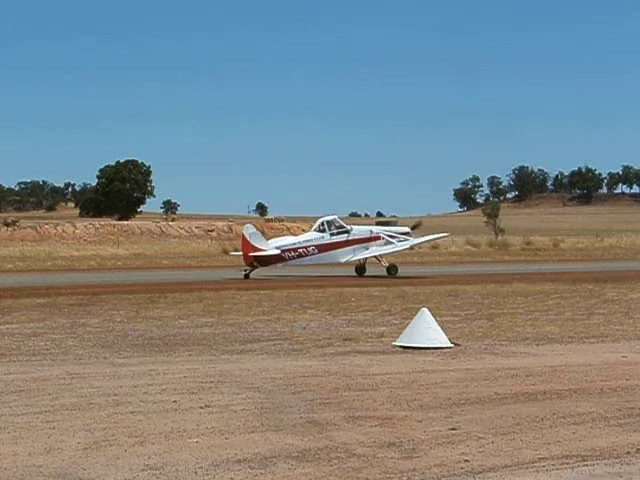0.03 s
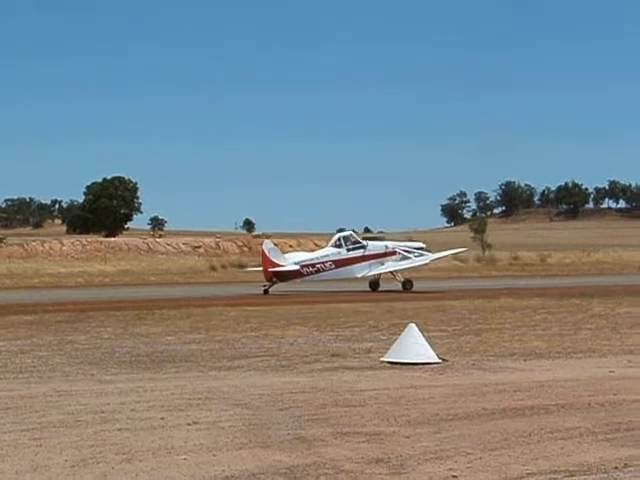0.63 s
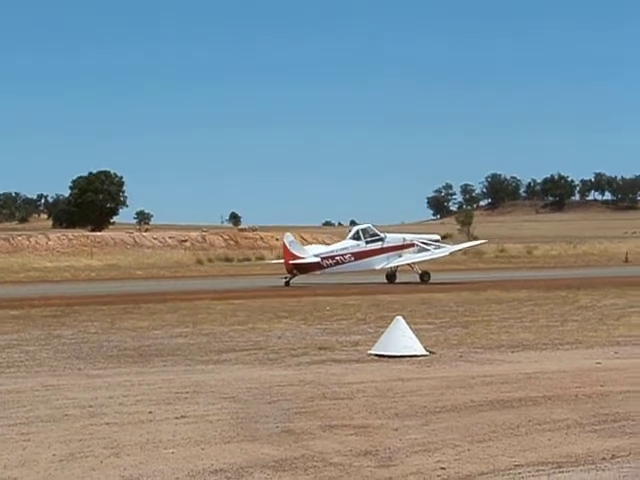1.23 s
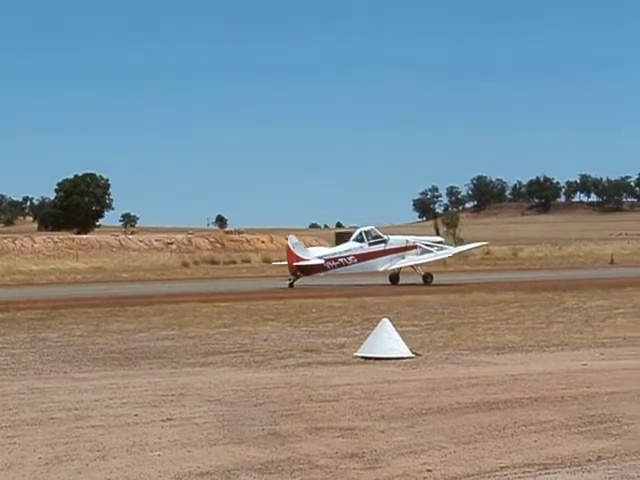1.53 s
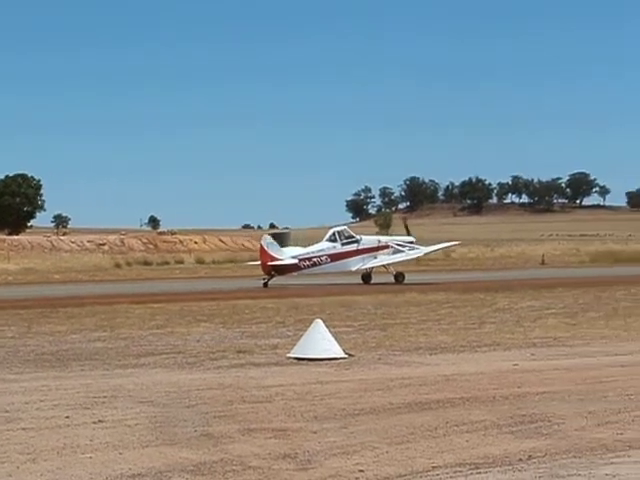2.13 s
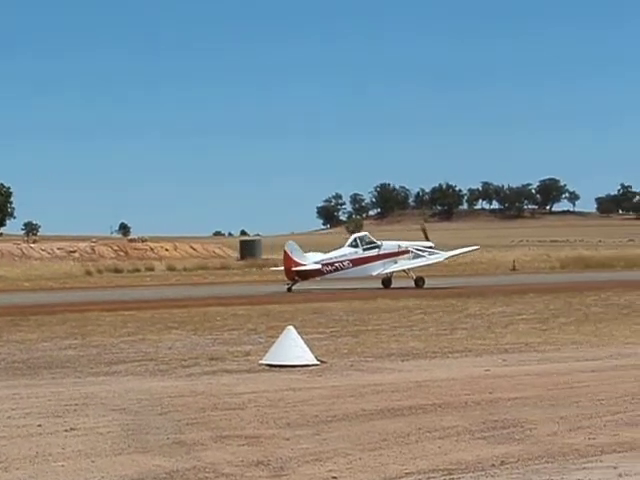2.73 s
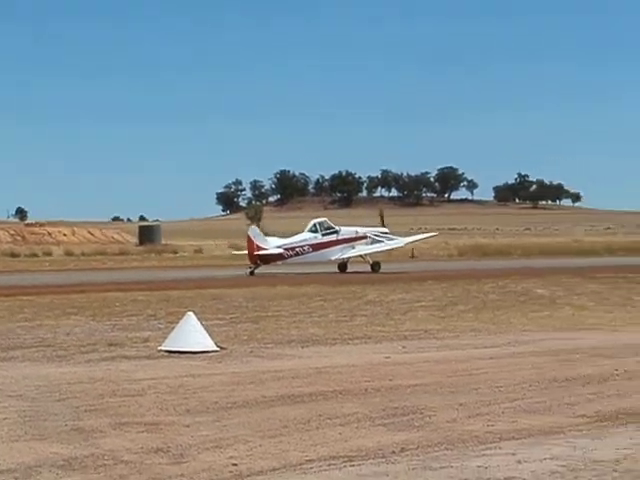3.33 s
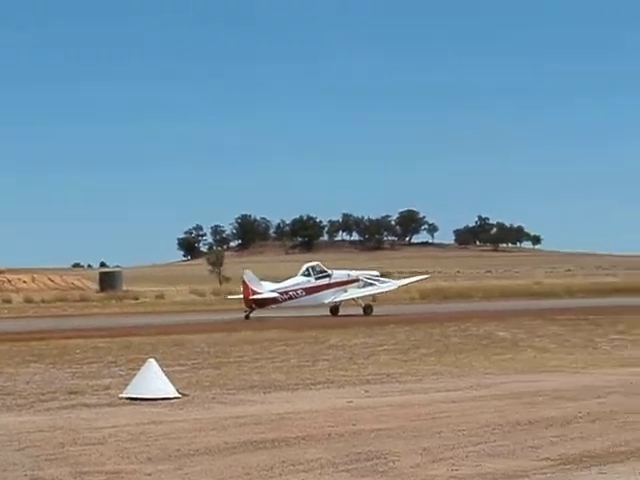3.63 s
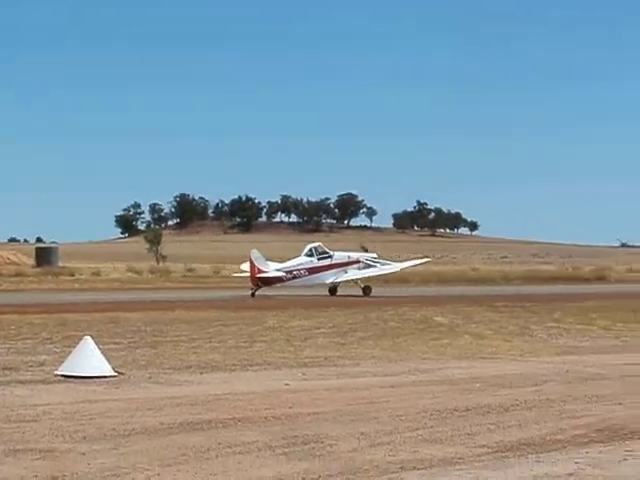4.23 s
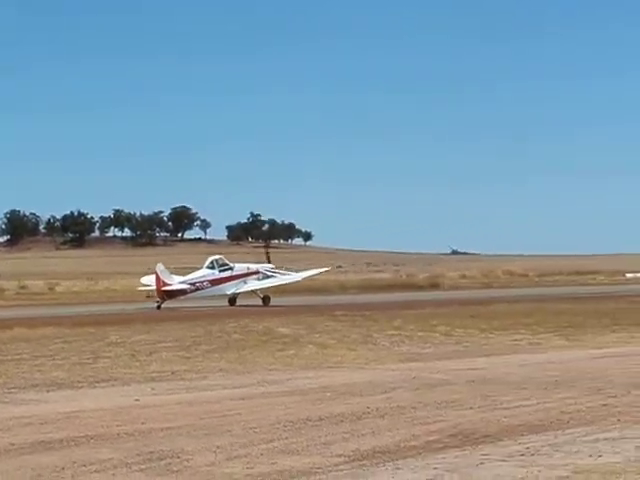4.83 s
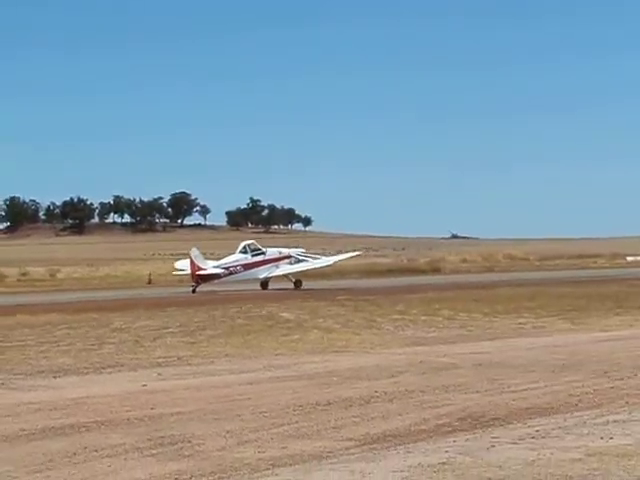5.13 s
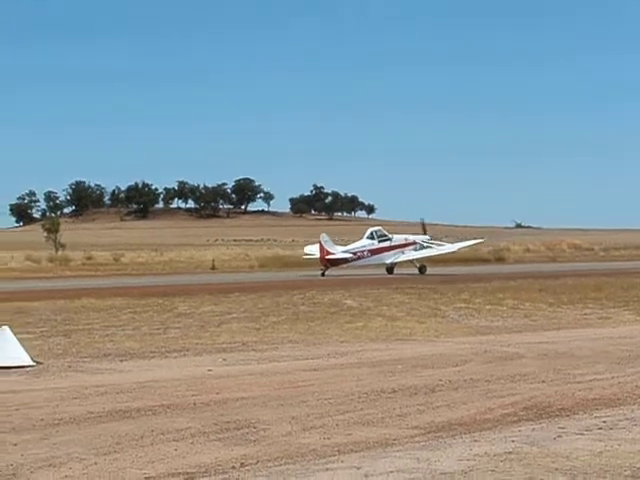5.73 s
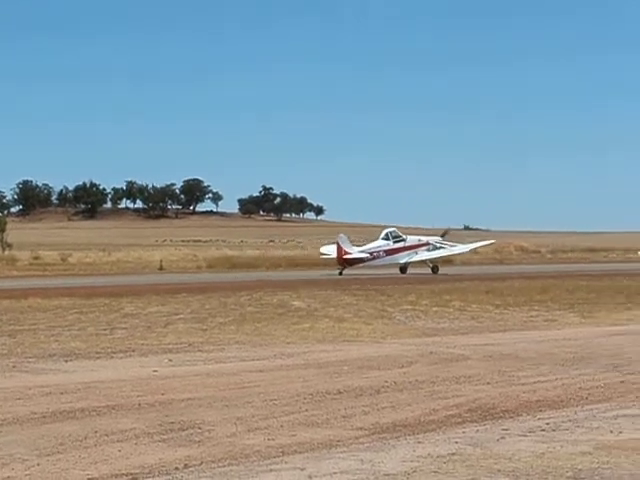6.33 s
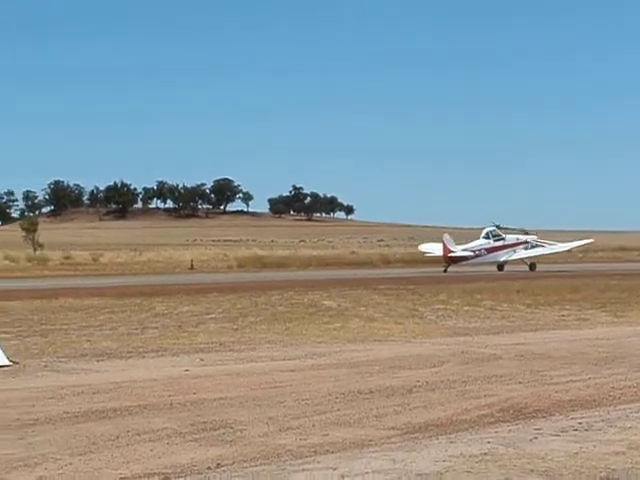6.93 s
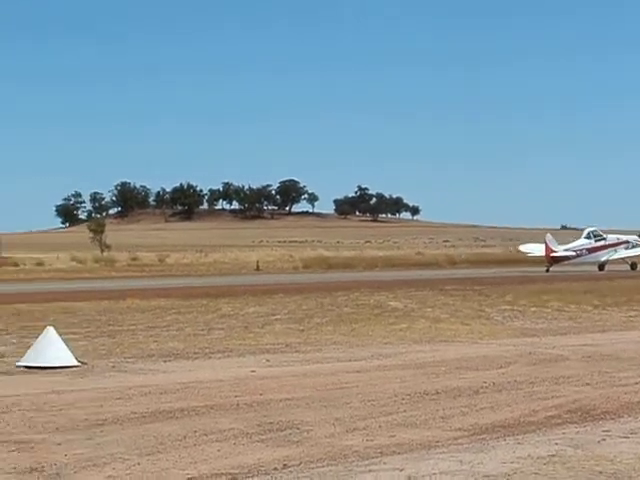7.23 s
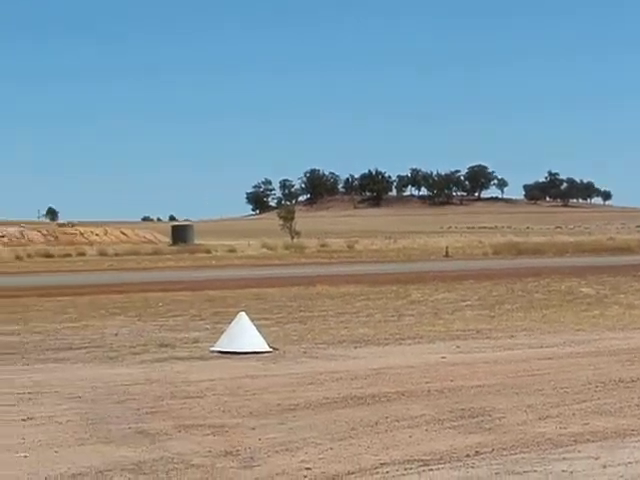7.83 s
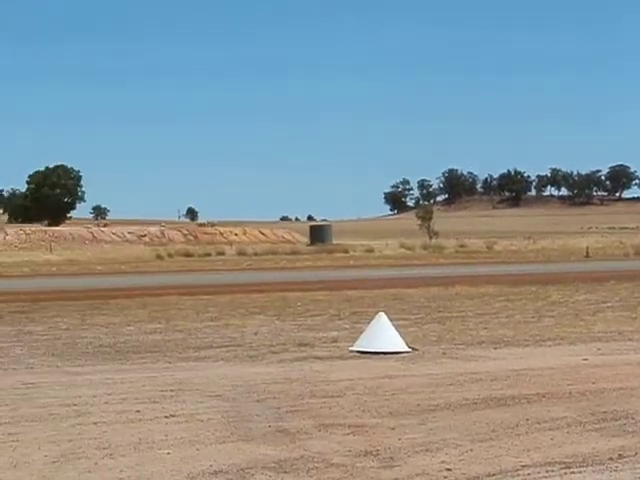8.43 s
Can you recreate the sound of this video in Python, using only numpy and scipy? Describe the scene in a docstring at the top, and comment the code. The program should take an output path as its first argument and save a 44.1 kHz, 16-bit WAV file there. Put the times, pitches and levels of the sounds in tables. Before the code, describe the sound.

Outdoors, a short way from a runway, a light plane's piston engine runs at an even speed, mixing a humming drone and fast exhaust bark with the buzzing rasp of its propeller. It is fullest while passing side-on, then grows thinner, choppier and somewhat quieter from behind. The level drops suddenly and recovers a few times, most clearly early on and near the end. Faint wind rumbles below.

```python
"""The drone and rasp of a single-engined tow plane taxiing past on a dry airfield, near 2100 rpm.
Its six cylinders fire through short exhaust stacks; the two-bladed propeller hums and
rasps once for every blade. Heard from behind, the hum thins out and the rasp turns choppy.
A light breeze rumbles underneath. A few times the whole sound dips abruptly and creeps back,
and once the beat skips with a faint tick."""
import sys
import numpy as np
from scipy import signal
from scipy.fft import rfft, irfft, next_fast_len
from scipy.io import wavfile
from scipy.ndimage import map_coordinates

SR = 44100
rng = np.random.default_rng(int(sys.argv[2]) if len(sys.argv) > 2 else 0)


def inscribe(sig):
    """Save sig as 16-bit PCM at rate SR to the path in sys.argv[1].

    A 1-D sig is mono; a 2-D sig holds one channel per row.
    Samples are clipped to [-1, 1] before scaling.
    """
    pcm = np.round(np.clip(np.atleast_2d(sig).T, -1, 1) * 32767)
    wavfile.write(sys.argv[1], SR, pcm.astype(np.int16))


N = 383229
SKIP_S = 5.42  # the beat skips here

# propeller speed: (time [s], blade passages [Hz])
BLADE_RATE = [(0.08, 67.63), (0.35, 69.4), (0.6, 70.32), (0.9, 70.84), (1.3, 71.3), (2.5, 71.14),
              (4.0, 71.2), (5.4, 71.18), (6.0, 71.25), (6.6, 71.05), (7.3, 70.74), (8.0, 70.84),
              (8.69, 70.8)]
# our angle on the plane: (time [s], view [0 abeam, 1 just past, 2 behind, 3 tail on])
VIEW = [(0.5, 0), (2.4, 0.24), (4.6, 0.2), (5.8, 1.14), (7.3, 2), (7.7, 2.5), (8.7, 2.8)]
# exhaust pulses as they arrive: (position [share of the four-stroke cycle], size [gain])
CYLINDERS = [(0.056, 0.69), (0.229, 0.354), (0.401, 0.625), (0.557, 0.536), (0.732, 0.33), (.9, 0.914)]
# how low thrum, drone and exhaust bark radiate towards us: (view [0-3], level [dB])
THRUM_BEAM = [(0, -32), (1, -30), (2, -35), (2.5, -41)]
DRONE_BEAM = [(0, -24), (1, -26), (2, -25), (2.5, -28), (3, -28.5)]
BARK_BEAM = [(0, -29.5), (0.25, -33.5), (0.5, -31.5), (1, -32.5), (2, -37.5), (3, -36.5)]


def drone(cycle, blade_at, blade_size, waver_db, flutter_db):
    """The engine's pitched body: harmonics phased by one push per cylinder and blade."""
    # thrum at the blade and firing rates: (order [per cycle], level [dB])
    thrum_lines = [(4, -5.5), (6, -1.5)]
    # drone harmonics: (order [per cycle], level abeam [dB], just past [dB], behind [dB])
    drone_lines = [(9, -13.5, -13.5, -11.5), (10, -13.5, -8, -12), (13, -38, -18.5, -19),
                   (14, -25.5, -16.5, -23), (15, -18, -15.5, -12), (16, -6, -5, -11),
                   (17, -25.5, -34.5, -25), (18, -18.5, -9, -13.5), (19, -10.5, -9.5, -15.5),
                   (20, -10.5, -5.5, -6.5), (21, -11.5, -9, -12.5), (22, -7.5, -5, -9.5),
                   (23, -14, -31, -14.5), (24, -13, -16, -23), (25, -24, -17.5, -15.5),
                   (26, -19.5, -24, -26), (27, -12.5, -20, -28), (28, -18, -16, -27), (29, -30.5, -15, -20),
                   (30, -25.5, -20, -19), (31, -16, -29.5, -40.5), (36, -28, -21, -28),
                   (38, -26.5, -20, -17), (41, -29, -16, -30), (42, -27.5, -31, -25), (44, -22, -35.5, -41)]
    drone_db, thrum_db = heard_db(DRONE_BEAM) + wobble(9), heard_db(THRUM_BEAM)
    view_weights = np.array([blend(*row) for row in np.eye(3)])
    blades = [(blade_at + k / 4, blade_size) for k in range(4)]
    at, size = np.transpose(list(CYLINDERS) + blades)

    def line(order):
        phase = np.angle(np.sum(size * np.exp(-2j * np.pi * order * at)))
        return np.sqrt(2) * np.cos(2 * np.pi * order * cycle + phase)

    total = sum(amp(thrum_db + db + 0.27 * wobble(6.5)) * line(order) for order, db in thrum_lines)
    for order, *levels_db in drone_lines:
        # moving air shakes the higher lines more
        shake_db = np.sqrt(order / 20) * (waver_db * wobble(2.474) + flutter_db * wobble(15))
        total += amp(drone_db + np.dot(levels_db, view_weights) + shake_db - 1.62) * line(order)
    return total


def exhaust(cycle):
    """Every firing cracks out of its stack, followed by a chuff of hot gas."""
    # the chuff's dull tone: (frequency [Hz], level [dB])
    chuff_eq = [(40, -41.5), (90, -14), (160, -1.5), (260, -1.5), (370, 3), (480, -3), (620, -10.5),
                (1000, -49)]
    firings = sum(size * pulses(cycle, at, scatter_db=2.4, jitter_s=.00005) for at, size in CYLINDERS)
    gas_flow = puffs(firings, rise_s=0.00038, fall_s=0.0052) + 0.32
    bark = amp(heard_db(BARK_BEAM) - 6.5) * stacks(firings)
    chuff = amp(heard_db(DRONE_BEAM) - 8.0) * colour(gas_flow * rng.standard_normal(N), chuff_eq)
    return bark + chuff


def stacks(x):
    """The exhaust's midrange; the ground echo hollows it out as the plane draws away."""
    # stack tone from the side and from behind: (frequency [Hz], level [dB])
    abeam_eq = [(330, -52.5), (470, 4), (550, -3.5), (620, 0), (720, 0), (880, 0.5), (1080, 1),
                (1330, -3.5), (1600, -3.5), (1900, 0), (2600, -46.5)]
    behind_eq = [(330, -48.5), (480, -3), (630, 0.5), (740, -1), (850, 4), (945, -1), (1130, 2.5),
                 (1300, -7), (1480, -6), (1620, -5), (1900, -9.5), (2600, -40.5)]
    return blend(colour(x, abeam_eq), colour(x, behind_eq))


def propeller_hum(stroke, waver_db):
    """The propeller beams its second and third harmonics sideways; the second fades astern."""
    # how each harmonic radiates towards us: (view [0-3], level [dB])
    second_beam = [(0, -25.5), (1, -30.5), (2, -39.5), (2.5, -53), (3, -41.5)]
    third_beam = [(0, -31.5), (0.998, -25.5), (1.8, -37), (2.5, -35), (3, -27.5)]
    hum = np.zeros(N)
    for harmonic, beam in (2, second_beam), (3, third_beam):
        gain = amp(heard_db(beam) + waver_db * wobble(5.5))
        hum += gain * np.sqrt(2) * np.cos(2 * np.pi * harmonic * stroke)
    return hum


def propeller_rasp(stroke):
    """Each blade swinging towards us gives a turbulent burst; a bright ring is heard in time with it."""
    # tone of the blade rasp, the zing near 4.3 kHz and the tip hiss: (frequency [Hz], level [dB])
    rasp_eq = [(1300, -39), (1560, -13.5), (1780, -12), (2020, -2), (2220, -4.5), (2450, -1), (2640, 2),
               (2820, -5), (3000, -10), (3350, -15.5), (4000, -61.5)]
    zing_eq = [(3000, -41.5), (3700, -5.5), (4000, -0.5), (4300, 3.5), (4650, -1), (5000, -11),
               (5800, -46.5)]
    hiss_eq = [(2700, -22), (3200, -9.5), (3500, 0.5), (3900, -4), (4500, -6), (5150, -6.5), (5600, 0.5),
               (6000, -0.5), (6700, -3), (7200, -10), (7600, -13), (8300, -25), (8900, -43.5)]
    # their fader rides: (time [s], level [dB])
    rasp_ride = [(0.12, -23.0), (0.68, -19.5), (1.18, -23.5), (1.24, -18.5), (1.96, -21.5), (2.02, -17.0),
                 (2.44, -21), (2.82, -20.5), (2.98, -23.5), (3.14, -20), (3.3, -25.0), (3.64, -17.5),
                 (3.8, -23.5), (4.06, -21.0), (4.46, -25), (4.64, -19.5), (5.1, -22.5), (5.16, -19.5),
                 (6.22, -19.5), (6.28, -24), (6.68, -19.0), (7.2, -24.5), (7.74, -20), (7.98, -25.0),
                 (8.22, -21.0), (8.66, -21.5)]
    zing_ride = [(0.12, -34), (0.58, -40.5), (1.02, -31.5), (1.54, -36.0), (1.64, -41.5), (2.9, -34.5),
                 (4.12, -34.5), (4.4, -45), (4.6, -34.5), (4.96, -40.5), (5.4, -33.0), (5.52, -39),
                 (6.78, -34.5), (7.22, -39.0), (7.3, -32.5), (7.48, -40.5), (7.72, -34), (7.82, -42.0),
                 (8.26, -40.5), (8.66, -43.5)]
    hiss_ride = [(0.12, -31.5), (0.62, -34), (0.72, -28.5), (0.84, -33), (1.54, -30.5), (1.58, -34.0),
                 (2.34, -32.5), (2.42, -35.5), (2.82, -31.0), (3.96, -36), (4.08, -31), (4.26, -37),
                 (5.56, -34.5), (5.68, -38), (6.56, -33.5), (7.28, -37.5), (7.36, -33), (7.84, -39),
                 (8.28, -35.5), (8.66, -40.5)]
    # steady wash between strokes: (view [0-3], level relative to a stroke [dB])
    wash = [(0, -5), (1, -9.5), (2.001, -10)]
    flicker_db = 0.68 * wobble(12)  # moving air makes the treble flicker
    fader = lambda ride: amp(curves(ride)[0] + flicker_db + 0.4 * wobble(8))
    swish = puffs(pulses(stroke, 0, scatter_db=1.68, jitter_s=.00015), rise_s=0.0016, fall_s=0.0023)
    bursts = lambda floor: np.hypot(swish, floor) * rng.standard_normal(N)
    # the ring stands out more as the plane turns its tail
    ring_share = 0.22 + 0.069 * curves(VIEW)[0]
    ring = bright_ring(stroke, ring_hz=2601, pitch_spread=0.035, phase_spread=1.0)
    turbulence = colour(bursts(floor=amp(by_view(wash))), rasp_eq)
    rasp = np.sqrt(ring_share) * ring + np.sqrt(1 - ring_share) * turbulence
    zing = colour(bursts(floor=0.28), zing_eq)
    hiss = colour(bursts(floor=0.39), hiss_eq)
    whoosh = amp(heard_db(BARK_BEAM) - 1.2) * stacks(bursts(floor=0.53))
    return fader(rasp_ride) * rasp + fader(zing_ride) * zing + fader(hiss_ride) * hiss + whoosh


def bright_ring(stroke, ring_hz, pitch_spread, phase_spread):
    """A short, bright ring is heard in time with each blade stroke, at a slightly new pitch each time."""
    # rings that stand out: (time [s], boost [dB])
    accents = [(1.989, 7), (2.003, 8), (2.101, 6), (2.594, 9), (2.677, 9), (2.79, 9.5), (3.675, 2),
               (4.883, 5.5), (5.549, 7), (5.604, 6), (6.617, 5.5), (6.983, 6), (7.068, 6), (7.251, 6.5),
               (7.406, 8.5), (7.519, 9), (7.688, 3.5), (7.703, 6.5), (7.858, 6.5), (8.451, 7)]
    hits = pulses(stroke, 0, scatter_db=2.0, jitter_s=.0001)
    reach = SR // 150  # about half the gap between strokes
    for s, boost_db in accents:
        hits[round(s * SR) - reach:round(s * SR) + reach] *= amp(boost_db)
    blade_hz = curves(BLADE_RATE)[0]
    since_stroke_s = stroke % 1 / blade_hz
    pitch_hz = ring_hz * (1 + pitch_spread * wobble(np.mean(blade_hz)))
    ring = np.cos(2 * np.pi * pitch_hz * since_stroke_s + phase_spread * wobble(20))
    return unit(puffs(hits, rise_s=0.0023, fall_s=0.0012) * ring)


def breeze():
    """Light wind rumbles faintly under the engine's thrum, following its level."""
    # the wind's rumble: (frequency [Hz], level [dB])
    wind_eq = [(20, -11), (55, -4), (120, 6), (400, -7), (2000, -25), (8000, -37)]
    gain = amp(heard_db(THRUM_BEAM) - 20.0 + 2.8 * wobble(3))
    return gain * colour(rng.standard_normal(N), wind_eq)


def dips(fall_s, recover_s):
    """A gain that ducks quickly at each dip and creeps back."""
    # dips of the whole mix: (time [s], depth [dB])
    ducks = [(0.54, 1.8), (1.319, 1.6), (2.01, 6), (2.81, 2), (3.72, 1), (7.72, 5.5)]
    duck_db = np.zeros(N)
    for s, depth_db in ducks:
        since = np.arange(N) / SR - s
        attack = np.clip(since / fall_s + .5, 0, 1)
        duck_db += depth_db * attack * np.exp(-np.maximum(since, 0) / recover_s)
    return amp(-duck_db)


def heard_db(beam):
    """A layer's level: its beam in the listener's direction plus a common swell."""
    # slow swells of the engine's sound: (time [s], level [dB])
    swell = [(0.12, 0.4), (0.72, -0.4), (1.22, 4), (1.56, 0), (1.72, 1.1), (3.24, 0), (3.56, 3),
             (3.76, 0.6), (4.62, 0.9), (4.68, -0.6), (5.82, 1.7), (6.22, -2), (6.54, 3.3), (6.82, 0.3),
             (8.58, 0.2), (8.66, 3.2)]
    return by_view(beam) + curves(swell)[0]


def by_view(points):
    """Follow (view, value) points as the plane rolls by."""
    return np.interp(curves(VIEW)[0], *np.transpose(points))


def blend(*versions):
    """Crossfade through the versions as the view turns from abeam to behind."""
    place = curves(VIEW)[0].clip(0, 2) / 2 * (len(versions) - 1)
    return sum(v * np.maximum(0, 1 - abs(place - k)) for k, v in enumerate(versions))


def pulses(turn, at, scatter_db, jitter_s):
    """One click of random size per turn, at the share `at` of the way round."""
    marks = np.arange(np.ceil(turn[0]), np.floor(turn[-1])) + at
    timing, strength = rng.standard_normal((len(marks), 2)).T
    place = np.interp(marks, turn, np.arange(N)) + jitter_s * SR * timing
    clicks = np.zeros(N)
    clicks[np.clip(place, 0, N - 1).astype(int)] = amp(scatter_db * strength)
    return clicks * (abs(np.arange(N) / SR - SKIP_S) > .001)  # no clicks during the skip


def puffs(clicks, rise_s, fall_s):
    """Each click becomes an envelope that opens fast and dies away."""
    t = np.arange(SR // 20) / SR
    shape = (1 - np.exp(-(t / rise_s) ** 2)) * np.exp(-t / fall_s)
    return signal.fftconvolve(clicks, shape / shape.max())[:N]


def colour(x, eq, size=8192):
    """x at rms 1 after a minimum-phase EQ through (frequency [Hz], level [dB]) points."""
    hz, db = np.transpose(eq)
    gain = amp(np.interp(np.log(np.fft.rfftfreq(size, 1 / SR) + 1), np.log(hz), db))
    cepstrum = irfft(np.log(gain))
    cepstrum[1:size // 2] *= 2
    cepstrum[size // 2 + 1:] = 0
    impulse = irfft(np.exp(rfft(cepstrum)))
    return unit(signal.fftconvolve(x, impulse)[:N])


def lowpass(x, top_hz):
    """Nothing above top_hz."""
    size = next_fast_len(N + SR // 2)
    passband = np.fft.rfftfreq(size, 1 / SR) < top_hz
    return irfft(rfft(x, size) * passband, size)[..., :N]


def wobble(rate):
    """A smooth random curve, rate knots a second."""
    coarse = np.arange(0, N + 64, 64)
    knots = rng.standard_normal(int(N * rate / SR) + 4)
    smooth = map_coordinates(knots, [coarse * rate / SR], mode="nearest")
    return np.interp(np.arange(N), coarse, smooth)


def curves(rows):
    """One value per sample for each column after the time."""
    times, *columns = np.transpose(rows)
    return [np.interp(np.arange(N) / SR, times, column) for column in columns]


def amp(db):
    """Decibels to gain."""
    return 10 ** (np.asarray(db) / 20)


def unit(x):
    """x at rms 1."""
    return x / np.sqrt(np.mean(x ** 2) + 1e-20)


def scene():
    """The propeller sits on the crankshaft: four blade passages to each four-stroke cycle."""
    cycle = np.cumsum(curves(BLADE_RATE)[0]) / SR / 4
    cycle += .413 * (np.arange(N) / SR > SKIP_S)  # the beat skips by part of a cycle
    blade_at = .045  # share of the cycle at which the first blade pushes
    stroke = 4 * (cycle - blade_at)
    engine = drone(cycle, blade_at, blade_size=.3, waver_db=2.5, flutter_db=0.92) + exhaust(cycle)
    # a blade's noise starts a little ahead of its low push
    propeller = propeller_hum(stroke, waver_db=0.95) + propeller_rasp(stroke + 0.1881)
    mix = engine + propeller + breeze()
    return (dips(fall_s=.02, recover_s=0.42) * mix)[None]


def record(dry):
    """The sound cuts in after a moment, peaks rounded and top end cut; a faint tick marks the skip."""
    t = np.arange(N) / SR
    opened = dry * (t > .072)
    rounded = opened / (1 + (opened / .78) ** 4) ** .25
    tick_envelope = (t > SKIP_S) * np.exp(-abs(t - SKIP_S) / .0006)
    tick = amp(-32) * tick_envelope * rng.standard_normal(N)
    return lowpass(rounded, top_hz=8900) + lowpass(tick, top_hz=16000)


dry = scene()
out = record(dry)
inscribe(out)
```